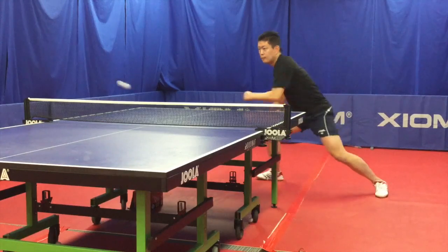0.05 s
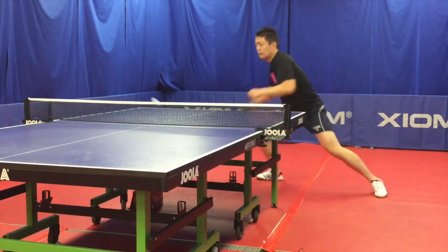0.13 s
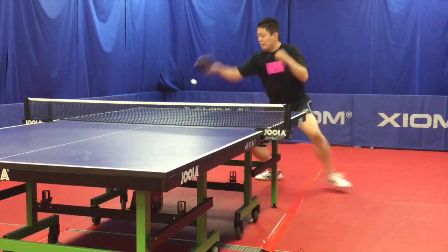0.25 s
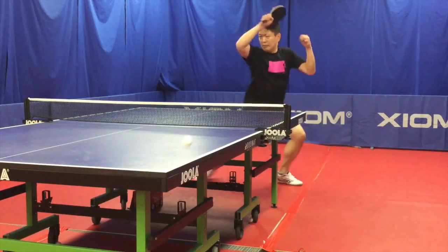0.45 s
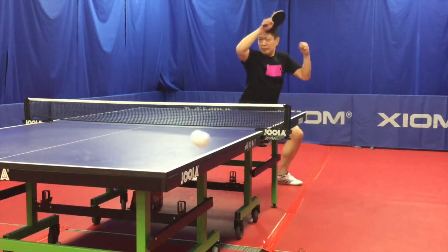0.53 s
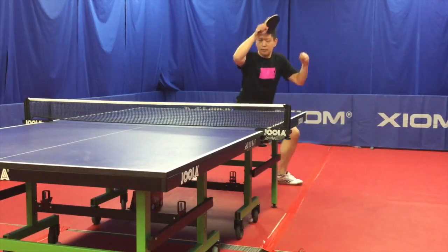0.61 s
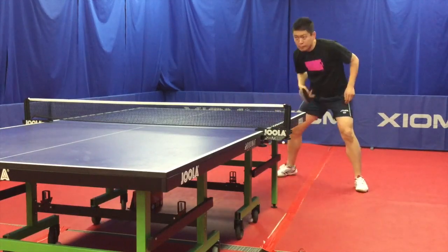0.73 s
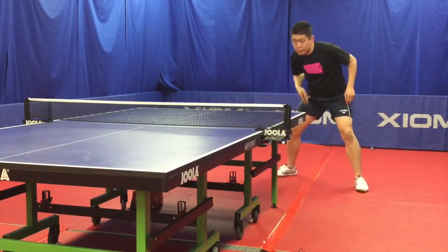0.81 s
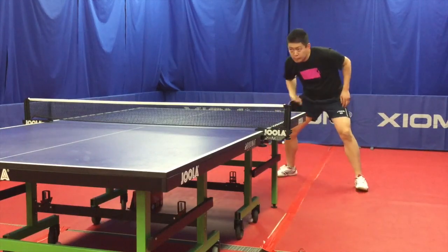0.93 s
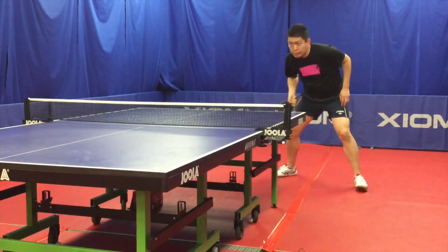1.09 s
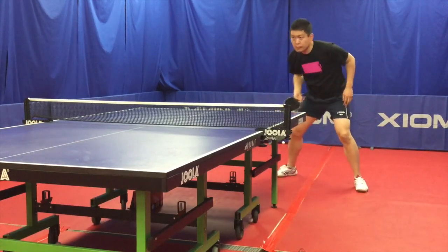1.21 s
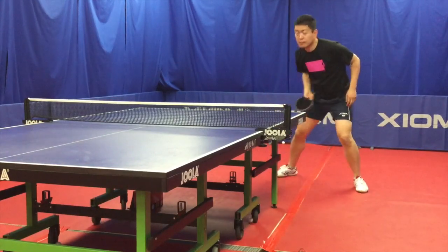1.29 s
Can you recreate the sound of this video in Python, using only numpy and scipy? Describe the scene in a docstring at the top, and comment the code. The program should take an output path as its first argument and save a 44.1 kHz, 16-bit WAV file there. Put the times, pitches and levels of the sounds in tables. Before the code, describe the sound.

A table tennis ball bounces on the table at about 0.2 seconds, is struck sharply by a racket at 0.3 and lands near the microphone at 0.5. Shoes knock on the sprung floor at 0.1 seconds, then thud, scuff and briefly slide between 0.4 and 0.8. Softer footfalls follow until about 1.3 seconds. The sports hall adds a short echo and a quiet low rumble.

```python
"""Table tennis rally in a curtained sports hall

The ball bounces on the far half of the table, is driven back with a racket and lands near the
microphone; each contact rings the ball's shell and the surface it meets. Shoes knock and scuff
on the sprung floor. The hall answers ball and shoes over a quiet background."""
import sys
import numpy as np
from scipy import signal
from scipy.fft import rfft, irfft
from scipy.io import wavfile

SR = 44100
rng = np.random.default_rng(int(sys.argv[2]) if len(sys.argv) > 2 else 0)


def to_wav(s):
    """Save 16-bit WAV."""
    ch = np.atleast_2d(s).T  # columns
    pcm = np.round(np.clip(ch, -1, 1) * 32767)  # PCM
    wavfile.write(sys.argv[1], SR, pcm.astype(np.int16))


N = 59535
T = np.arange(N) / SR

# ball contacts (time [s], surface [dB], shell [dB], pock [dB], tick [dB], surface hall send [dB],
# shell hall send [dB], shell pitch [ratio], first echo delay [s], first echo [dB])
RACKET_HITS = [(-.17, 3, -7.5, -2.5, -11, 6, 2.2, 1.0, .004, -5),
               (.3128, -5.5, 8, 2.5, -1, 6.43, 0.63, 1.005, .0032, -2)]  # the first is only a dying echo
TABLE_HITS = [(.2275, -1.5, -6.5, -3.5, -14, 6.5, 9, 0.99, 0.0032, 3),
              (.5160, -5, 0.5, -29, -3.5, 10, 2, 1.0, .0052, -5)]
# modes (frequency [Hz], level at resonance [dB], t60 [s])
SHELL_MODES = [(8380, 1, 0.03), (8766, 3.5, .025), (9050, 4, 0.03), (10640, -2.5, 0.019),
               (11750, -6, 0.0076), (12510, -5.5, .012), (13820, -12, 0.0074)]
RACKET_MODES = [(770, 4, 0.019), (1330, 12, 0.013), (1658, 7, 0.0073), (2957, 10.5, 0.048),
                (3340, 10.5, 0.048), (4970, 1.5, 0.012)]
TABLE_MODES = [(336, -1, .03), (572, -2, .035), (1241, -4.5, 0.031), (1623, 5.5, 0.023), (1755, 7.5, .026),
               (2120, -2, .012), (3470, -8.5, 0.014), (3610, -7.5, 0.03)]
RACKET_POCK_MODES = [(3050, 15.1, .016)]  # pock: brief ring of the struck spot
TABLE_POCK_MODES = [(1360, 13, .013), (2123, 15, 0.0077)]
FLOOR_MODES = [(167.2, 8.5, .12), (197.4, 14, 0.17), (246, 5.5, .1), (270, -1, .08)]
HEEL_MODES = [(276, 8.5, 0.098), (397, 0.5, 0.082), (623, -6.5, 0.015)]
# noise spectra (frequency [Hz], level [dB])
RACKET_CRACK_SPECTRUM = [(100, -35.5), (260, 2), (450, 1.5), (900, 3), (1600, 11), (2200, 0), (3200, 6.5),
                         (5800, -6.5), (7500, -3.5), (12000, -10), (16000, -22.5)]  # broad crack of the contact
TABLE_CRACK_SPECTRUM = [(100, -33.5), (260, 0.5), (480, -5.5), (900, 0.5), (1500, 8.5), (2100, -8),
                        (2700, -13.5), (3700, -15), (4600, -18.5), (6200, -26), (11000, -20),
                        (16000, -27.5)]
TICK_SPECTRUM = [(300, -23), (1500, -14.5), (3500, -7.5), (5500, -18.5), (7400, -8), (8800, 0),
                 (9700, -7.5), (10800, 4.5), (13000, -4.5), (16000, -19.5)]  # first touch of the shell
BACKGROUND_SPECTRUM = [(25, -52), (50, -40.5), (80, -37.5), (130, -39), (220, -40), (400, -53),
                       (800, -58.5), (1400, -55.5), (2500, -63), (4200, -63.5), (7000, -70), (12000, -71),
                       (16000, -77.5)]
SLAP_SPECTRUM = [(80, -27.5), (130, -21), (200, 1), (300, -2), (480, -14.5), (750, -11), (1600, -16),
                 (2600, -23), (8000, -44)]
SCUFF_SPECTRUM = [(500, -10.5), (2000, -24), (3500, -12), (6000, -17), (9000, -15), (13000, -20.5),
                  (16000, -31)]
# background contour (time [s], relative level [dB])
BACKGROUND_CONTOUR = [(0, 9.5), (.2, 6.5), (.775, 3.5), (.79, -4.5), (.84, -3.5), (.87, 2.5), (1.02, -0.5),
                      (1.08, 3.5), (1.22, -2.5), (1.35, 3.5)]
# weight landing on the floor (time [s], frequency [Hz], level at resonance [dB], t60 [s])
FLOOR_THUDS = [(.05, 73.6, 7.5, 0.19), (.468, 72.5, 8.5, 0.15), (.572, 54.8, 22.5, 0.33),
               (.578, 90.7, 13.5, 0.18), (.64, 57, 16.5, 0.26), (.645, 104, 11.5, 0.056),
               (.735, 69.4, 10, 0.24), (.79, 96, 7, 0.18), (.88, 92.6, 9, 0.056), (0.994, 103, 7.5, 0.079),
               (1.064, 100, 10, 0.043), (1.179, 90.7, 4, 0.13)]
# footfalls (time [s], floor knock [dB], sole slap [dB], scuff [dB], heel [dB])
FOOTFALLS = [(0.1, 0, -4.5, -28, -9), (.127, 2, -9.5, -27, -24), (.4355, 1, 0.5, -0.5, 2.5),
             (.465, -4, -3, -17, -16), (.546, 5.5, 8, -23, 1.5), (.583, -0.5, -4, -13, -11),
             (.645, -12, -11.5, -22, -19), (1.262, -18.5, -24, -34.5, -26),
             (1.284, -16, -20.5, -29.5, -23.5)]
# hall decay (frequency [Hz], t60 [s])
HALL_DECAY = [(100, .5), (300, 0.32), (700, 0.32), (1500, 0.31), (3500, 0.27), (9000, 0.32), (16000, 0.23)]
# wall reflections (delay [s], level [dB])
WALL_REFLECTIONS = [(.0112, -9), (.0198, -11.5), (.0245, -14)]

HALL_GAP_S, HALL_RISE_S = .003, .0013
SHELL_LAG_S, TICK_LAG_S, SURFACE_LAG_S = .0005, .0005, .0015  # the whole surface lags the struck spot
POCK_RISE_S, SLAP_RISE_S, THUD_RISE_S = .0005, .00072, .01
POCK_SEND_DB, TICK_SEND_DB, SLAP_SEND_DB, KNOCK_SEND_DB = -15.5, -9, 2, -8  # into the hall
CRACK_RE_SURFACE_DB, BACKGROUND_DB = -2.5, -8.5
SLIDE_START_S, SLIDE_DB = .56, 3
BALL_LOW_CUT_HZ, MIC_LOW_CUT_HZ, HIGH_CUT_HZ = 120, 38, 16000


def from_db(db):
    """Decibels to gain."""
    return 10 ** (np.asarray(db) / 20)


def at_hz(points, hz):
    """Read a table on a log-frequency axis."""
    points_hz, values = np.transpose(points)
    return np.interp(np.log(np.maximum(hz, 1)), np.log(points_hz), values)


def add(out, sound, time_s):
    """Mix a sound in at time_s, which may be negative."""
    offset = int(round(time_s * SR))
    start = max(offset, 0)
    part = sound[max(-offset, 0):max(N - offset, 0)]
    out[start:start + len(part)] += part


def noise(spectrum):
    """Steady coloured noise."""
    gain = from_db(at_hz(spectrum, np.fft.rfftfreq(N, 1 / SR)))
    return irfft(rfft(rng.standard_normal(N)) * gain, N)


def attack(rise_s):
    """Exponential rise to 1."""
    return 1 - np.exp(-T / rise_s)


def fade(t60_s, rise_s):
    """Attack and exponential decay, unit energy."""
    shape = from_db(-60 * T / t60_s) * attack(rise_s)
    return shape / np.sqrt(np.sum(shape ** 2))


def ring(modes, pitch=1):
    """Struck modes: damped sines of alternating sign."""
    out = np.zeros(N)
    for k, (hz, db, t60_s) in enumerate(modes):
        decay_per_s = np.log(1000) / t60_s
        amplitude = (-1) ** k * from_db(db) * 2 * decay_per_s / SR
        out += amplitude * np.exp(-decay_per_s * T) * np.sin(2 * np.pi * hz * pitch * T)
    return out


def hall_tail(spectrum=((100, 0), (10000, 0))):
    """Diffuse hall response to a coloured click; each octave dies at its own rate."""
    out = np.zeros(N)
    hz = np.fft.rfftfreq(N, 1 / SR)
    noise_bins = rfft(noise(spectrum))
    centres_hz = 125 * 2. ** np.arange(8)
    for centre_hz, weights in zip(centres_hz, np.eye(len(centres_hz))):
        band = irfft(noise_bins * at_hz(np.c_[centres_hz, weights], hz), N)
        add(out, band * fade(at_hz(HALL_DECAY, centre_hz), HALL_RISE_S), HALL_GAP_S)
    return out


def reverb(sound):
    """Hall reverberation, wet only."""
    return signal.fftconvolve(sound, hall_tail())[:N]


def ball_hits(hits, surface_modes, pock_modes, crack_spectrum):
    """Each contact cracks, ticks and rings surface and shell; echoes and the hall's tail follow."""
    out = np.zeros(N)
    for (time_s, surface_db, shell_db, pock_db, tick_db,
         surface_send_db, shell_send_db, pitch, echo_s, echo_db) in hits:
        crack = noise(crack_spectrum) * fade(t60_s=.015, rise_s=.0003)
        surface = from_db(surface_db) * ring(surface_modes)
        shell, tick = np.zeros(N), np.zeros(N)
        add(shell, from_db(shell_db) * ring(SHELL_MODES, pitch), SHELL_LAG_S)
        add(tick, from_db(tick_db) * noise(TICK_SPECTRUM) * fade(t60_s=.0093, rise_s=.0001), TICK_LAG_S)
        pock = from_db(pock_db) * ring(pock_modes) * attack(POCK_RISE_S) ** 2
        direct = shell + pock + tick + from_db(surface_db + CRACK_RE_SURFACE_DB) * crack
        add(direct, surface, SURFACE_LAG_S)
        for delay_s, db in [(0, 0), (echo_s, echo_db), *WALL_REFLECTIONS]:
            add(out, from_db(db) * direct, time_s + delay_s)
        send = from_db(surface_send_db) * surface + from_db(shell_send_db) * shell
        send += from_db(POCK_SEND_DB) * pock
        crack_tail = from_db(surface_db + surface_send_db) * hall_tail(crack_spectrum)
        tick_tail = from_db(tick_db + TICK_SEND_DB) * hall_tail(TICK_SPECTRUM)
        add(out, reverb(send) + crack_tail + tick_tail, time_s)
    return signal.sosfilt(signal.butter(3, BALL_LOW_CUT_HZ, "high", fs=SR, output="sos"), out)


def background():
    """Low rumble and faint hiss of the hall; the level dips briefly."""
    contour_db = np.interp(T, *np.transpose(BACKGROUND_CONTOUR))
    return noise(BACKGROUND_SPECTRUM) * from_db(contour_db + BACKGROUND_DB)


def footwork():
    """Soles slap, scuff and slide, heels clop; the sprung floor knocks and thuds under them."""
    out = np.zeros(N)
    floor = ring(FLOOR_MODES)
    heel = ring(HEEL_MODES) * attack(SLAP_RISE_S)
    for time_s, knock_db, slap_db, scuff_db, heel_db in FOOTFALLS:
        slap = noise(SLAP_SPECTRUM) * fade(t60_s=.044, rise_s=SLAP_RISE_S)
        slap += from_db(SLAP_SEND_DB) * hall_tail(SLAP_SPECTRUM)
        scuff = noise(SCUFF_SPECTRUM) * fade(t60_s=.069, rise_s=.012)
        knock = floor + from_db(KNOCK_SEND_DB) * reverb(floor)
        for db, sound in (knock_db, knock), (slap_db, slap), (scuff_db, scuff), (heel_db, heel):
            add(out, from_db(db) * sound, time_s)
    for time_s, hz, db, t60_s in FLOOR_THUDS:
        add(out, ring([(hz, db, t60_s)]) * attack(THUD_RISE_S), time_s)
    slide = noise(SCUFF_SPECTRUM) * fade(t60_s=.25, rise_s=.0073)
    add(out, from_db(SLIDE_DB) * slide, SLIDE_START_S)
    return out


def scene():
    """Ball, feet and hall at one microphone."""
    bounces = ball_hits(TABLE_HITS, TABLE_MODES, TABLE_POCK_MODES, TABLE_CRACK_SPECTRUM)
    strokes = ball_hits(RACKET_HITS, RACKET_MODES, RACKET_POCK_MODES, RACKET_CRACK_SPECTRUM)
    return (bounces + strokes + footwork() + background())[None]


def record(dry):
    """Microphone bass roll-off, then a steep high cut."""
    low_cut = signal.butter(3, MIC_LOW_CUT_HZ, "high", fs=SR, output="sos")
    high_cut = signal.ellip(8, .1, 60, HIGH_CUT_HZ, fs=SR, output="sos")
    return signal.sosfilt(high_cut, signal.sosfilt(low_cut, dry))


dry = scene()
out = record(dry)
to_wav(out)
```